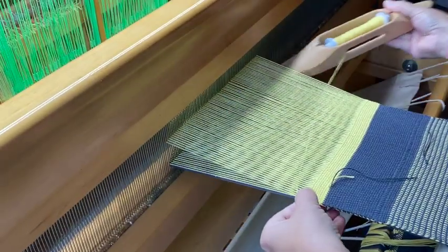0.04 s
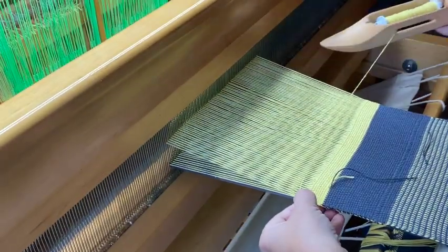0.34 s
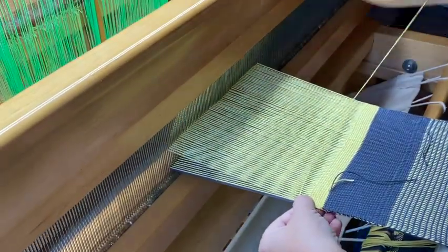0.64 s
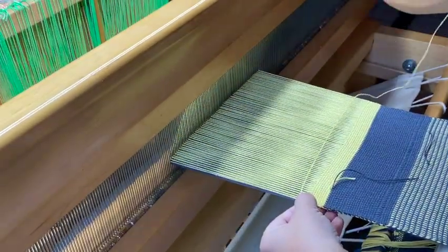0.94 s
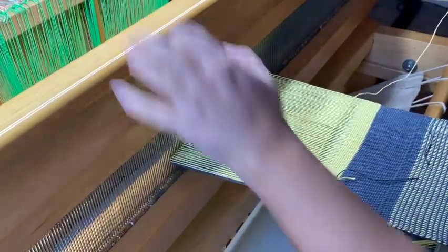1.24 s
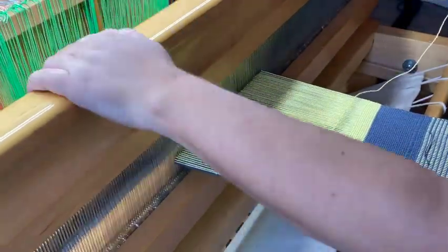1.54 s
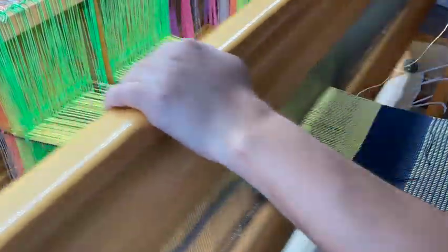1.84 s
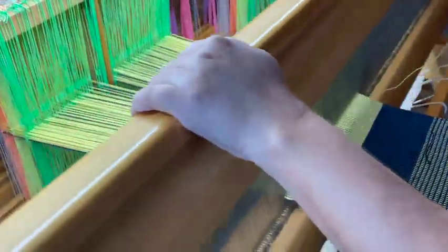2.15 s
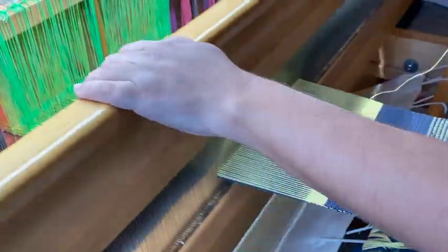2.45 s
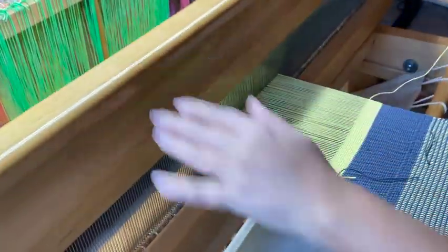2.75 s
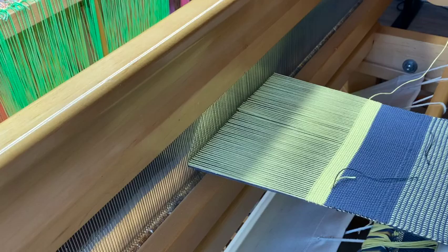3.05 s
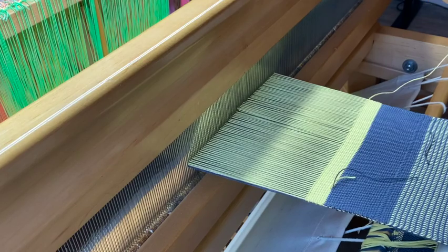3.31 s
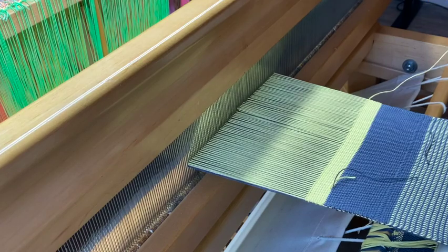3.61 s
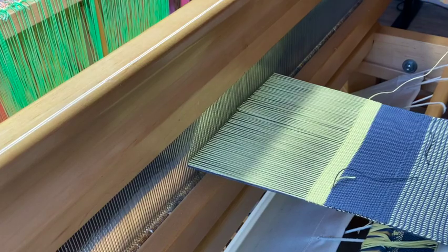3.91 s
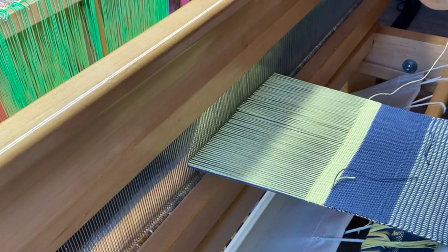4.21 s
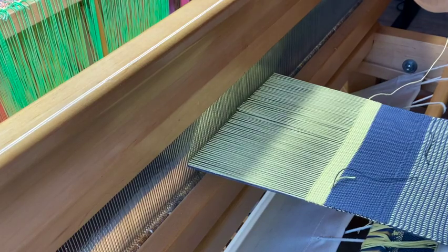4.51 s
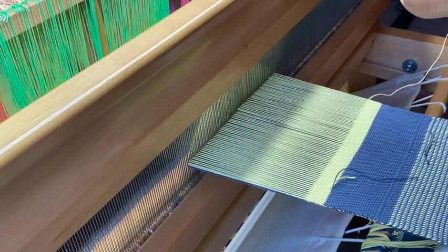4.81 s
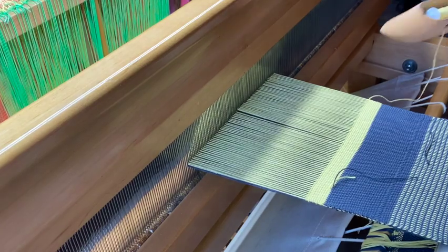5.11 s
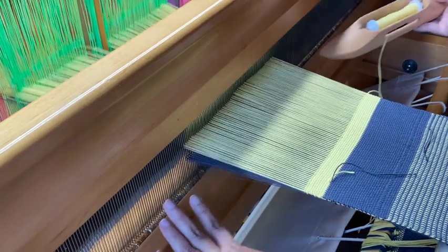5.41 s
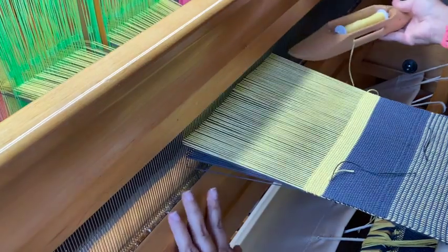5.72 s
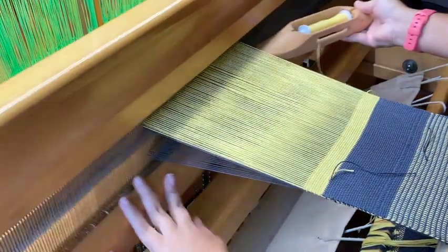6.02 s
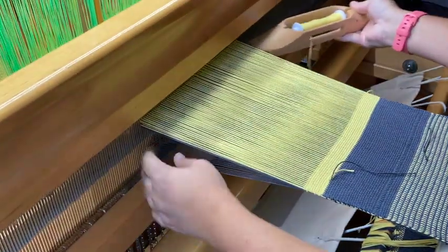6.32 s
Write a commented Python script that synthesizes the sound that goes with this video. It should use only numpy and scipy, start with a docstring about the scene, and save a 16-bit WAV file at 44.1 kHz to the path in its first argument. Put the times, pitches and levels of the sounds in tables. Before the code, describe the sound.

A wooden floor loom is worked in a small room, with clattering metal heddles, wooden knocks and brief high squeaks.

```python
"""One pick on a wooden floor loom in a small room, heard from the weaver's bench.
First the shuttle leaves the shed, its bobbin singing as thread runs off, and the shafts drop with
a clatter of metal heddles. Near 2 s the beater's reed brushes the warp and packs the weft; the beater
knocks on the frame and creaks back on its pivot. From 4.7 s treadles open the next shed and a shaft
scrapes in its guide. At 6 s the shuttle swishes in. Along the way small parts tick and joints squeak."""
import sys
import numpy as np
from scipy import signal
from scipy.fft import rfft, irfft, next_fast_len
from scipy.io import wavfile
from scipy.ndimage import uniform_filter1d

SR = 44100
rng = np.random.default_rng(int(sys.argv[2]) if len(sys.argv) > 2 else 0)


def to_wav(sig):
    """Store sig (one row per channel, or 1-D mono) as 16-bit WAV at the path in sys.argv[1].

    Samples outside -1..1 are clipped; the rate is SR.
    """
    pcm = np.clip(np.atleast_2d(sig), -1, 1) * 32767
    pcm = np.round(pcm).astype(np.int16)
    wavfile.write(sys.argv[1], SR, pcm.T)  # frames by channels


N = 280476
TIME_S = np.arange(N) / SR


# struck wooden parts: name -> (low edge [Hz], note [Hz], note boost [dB], hollow dip [dB], L-R [dB])
WOODEN_PARTS = {"shaft": (307, 820.5, 12.1, 1, 1), "beater": (421.5, 1013.5, 5.5, -3.5, 0.5),
                "post": (480, 560, 8.7, 0.62, 1.5), "treadle": (276, 380, 7.1, 8.3, 0.89),
                "lever": (502, 1860, 16, 2.3, 3.1), "rod": (680, 2300, 8.3, 26, 3.1),
                "handle": (340, 1340, 16, 22, 1.4), "crossbar": (450, 1350, 5.9, 3.5, 2.1),
                "stop": (379, 880, 14, 1.3, 0.86), "upright": (580, 460, 17, 9.5, 1.1),
                "link": (410, 830, 7, 27, 1.2), "pedal": (230, 80, 4.6, 27, 0.5)}
# blows: (time [s], level [dB], part, high edge [Hz], rise [s])
KNOCKS = [ (.165, -44, "shaft", 7000, 0.00085), (.579, -28, "rod", 5800, 0.0012),
          (0.652, -18, "shaft", 2900, 0.0014), (.722, -24.5, "lever", 2400, 0.0032),
          (.79, -17.5, "lever", 4450, 0.00082), (.818, -12, "shaft", 1550, 0.0029),
          (.866, -21.5, "shaft", 5000, 0.011), (.881, -13, "post", 2170, 0.0011),
          (.898, -13, "beater", 2600, 0.0022), (.924, -9, "crossbar", 2320, 0.00099),
          (.968, -14, "shaft", 2370, 0.00082), (1.072, -26.5, "link", 2000, 0.0016),
          (1.365, -24, "handle", 1300, 0.0033), (1.467, -19, "post", 1020, 0.0015),
          (1.477, -11.5, "beater", 1470, 0.0027), (1.508, -17, "post", 1400, 0.0025),
          (1.853, -35.5, "post", 1140, 0.00058), (2.007, -20, "rod", 5700, 0.0073),
          (2.056, -11, "beater", 1900, 0.0018), (2.112, -19, "beater", 1810, 0.0023),
          (2.161, -20, "lever", 2090, 0.00036), (2.245, -21.5, "post", 1700, 0.00061),
          (2.603, -28.5, "post", 1280, 0.0033), (2.782, -26.5, "lever", 3100, 0.0018),
          (3.135, -15, "treadle", 1700, 0.0048), (3.29, -31, "lever", 2020, 0.0022),
          (3.364, -11, "lever", 2240, 0.0045), (3.367, -18, "beater", 1450, 0.0011),
          (3.411, -23.5, "shaft", 1930, 0.0014), (4.656, -23.5, "link", 1735, 0.0011),
          (4.742, -20.5, "pedal", 1870, 0.0052), (4.871, -25.5, "rod", 3480, 0.0012),
          (4.965, -32.5, "link", 2600, .002), (4.979, -7.5, "crossbar", 2920, 0.0029),
          (4.997, -18.5, "lever", 2380, 0.00045), (5.026, -10, "crossbar", 2130, 0.0024),
          (5.052, -15, "shaft", 2250, 0.0024), (5.072, -14.5, "crossbar", 2200, 0.00066),
          (5.105, -18, "post", 1780, 0.0013), (5.163, -7, "stop", 2350, 0.0049),
          (5.2, -14.5, "stop", 2030, 0.0017), (5.273, -19, "post", 1440, 0.0016),
          (5.46, -20.5, "link", 2320, 0.0009), (5.473, -18, "upright", 2140, 0.00048),
          (5.503, -26, "link", 2100, .001), (5.602, -28, "post", 1700, .0008),
          (5.655, -20.5, "crossbar", 1940, 0.003), (5.749, -27.5, "post", 980, 0.001),
          (5.772, -31.5, "post", 1010, 0.0006), (5.803, -29, "upright", 1300, 0.0014),
          (6.025, -30, "upright", 910, 0.016)]

def knocks():
    """Wood hits wood: the harder the contact, the higher the frame modes it reaches."""
    out = np.zeros((2, N))
    for time_s, db, part, high_hz, rise_s in KNOCKS:
        low_hz, note_hz, note_db, hollow_db, side_db = WOODEN_PARTS[part]
        def gain(hz):
            contact = 1 / np.sqrt(1 + (hz / high_hz) ** 10)
            treble = amp(-43) * min(high_hz / 2400, 1.5) ** 2 / (1 + (hz / 6000) ** 4)
            radiation = 1 / np.sqrt((1 + (low_hz / (hz + 1)) ** 5.1) * (1 + hz / 900))
            note = amp(note_db / (1 + ((hz - note_hz) / 35) ** 2))
            hollow = amp(-hollow_db * np.exp(-((hz - 1164) / 220) ** 2))  # hollow parts lack mid modes
            return frame(hz) * (contact + treble) * radiation * note * hollow * modes(hz, spread_db=3)
        blow = burst(ring_s=0.0053, room_db=-4.5)
        blow *= 1 - np.exp(-np.arange(blow.shape[1]) / (rise_s * SR + 1))
        blow[0, 0] += amp(18) * np.exp(-rise_s / 0.0037)  # direct crack of a sudden contact
        add(out, time_s, amp(db + 1) * pan(side_db) * colour(blow, gain))
    return out


# shaft travel: (peak time [s], rise [s], hold [s], fall [s], rattle [dB], jingle [dB])
SHAFT_MOVES = [(.68, 0.143, 0.14, .2, -33.5, -37), (.9, 0.083, 0.029, 0.1, -20, -21.5),
               (1.02, 0.12, 0.03, 0.15, -30.5, -69), (4.73, 0.011, 0.023, 0.13, -40.5, -42.5),
               (5.04, 0.061, 0.019, 0.17, -27.5, -32.5), (5.2, 0.13, 0.26, 0.19, -26.5, -39.5),
               (5.35, 0.35, 0.076, 0.18, -50.5, -27)]
# spectra of wooden shafts and metal heddles: (frequency [Hz], level [dB])
RATTLE_EQ = [(130, -22), (240, -8.5), (330, -16.5), (500, -1.5), (850, -1), (1100, -7), (1450, -4),
             (2200, -4), (3300, -14.5), (5000, -16.5)]
JINGLE_EQ = [(1500, -19.5), (3000, 7.5), (4600, 4), (6300, -4.5), (7700, -6.5), (9600, -5), (11800, -10),
             (13000, -25.5), (15500, -34.5)]

def shafts(rattling, jingling):
    """Moving shafts rattle in their guides and shake the heddles."""
    rattle = contacts(lambda hz: spectrum(RATTLE_EQ, hz) * frame(hz),
                      per_s=260, spread_db=4, ring_s=0.014, wash=0.84, modes_db=4, parts=3)
    jingle = contacts(lambda hz: spectrum(JINGLE_EQ, hz),
                      per_s=240, spread_db=0.5, ring_s=0.014, wash=0.15, modes_db=4, parts=4)
    return amp(4.5) * rattle * rattling * pan(2.2) + amp(2) * jingle * jingling * pan(1)


# shuttle and beater travel:
# (peak time [s], rise [s], hold [s], fall [s], wood [dB], thread [dB], reed [dB])
RUB_MOVES = [(.01, .1, 0.11, 0.15, -58.5, -72.5, -85), (.19, 0.064, 0.61, .2, -53.5, -58, -93),
             (1.44, 0.15, 0.14, 0.12, -47, -65.5, -76), (1.66, 0.11, 0.4, 0.23, -53.5, -64, -65.5),
             (1.98, 0.093, 0.17, 0.039, -45, -51, -46.5), (2.06, 0.064, 0.025, 0.19, -44, -28.5, -49),
             (2.2, 0.17, 0.069, 0.48, -41, -41.5, -69), (2.76, 0.63, 0.12, 0.31, -46.5, -57.5, -84),
             (3.07, 0.047, 0.033, 0.076, -40, -46.5, -61), (3.39, 0.18, 0.0057, 0.14, -55.5, -52, -59),
             (3.62, 0.22, 0.085, 0.39, -59.5, -87.5, -105), (4.02, 0.094, 0.13, 0.18, -55.5, -66, -100),
             (5.82, 0.052, 0.26, 0.11, -40.5, -69, -60.5), (5.96, 0.18, 0.12, 0.095, -37.5, -51.5, -57),
             (6.25, 1, 0.12, .2, -48.5, -63, -71.5)]
# friction spectra: (frequency [Hz], level [dB])
WOOD_EQ = [(120, -23), (300, -2.5), (550, 7), (1100, -0.5), (1700, -1), (2400, -11), (4000, -26.5)]
THREAD_EQ = [(1500, -0.5), (2800, 4), (4200, 1.5), (5500, -10.5), (7500, -14.5), (9000, -31)]
REED_EQ = [(5000, 0.5), (7500, -4), (8600, -3.5), (9800, -1.5), (12000, -2.5), (13200, -12), (15300, -18.5)]

def rubbing(sliding, catching, brushing):
    """Wood slides on wood, threads catch on each other, the reed hisses along the warp."""
    wood_rest_db, thread_rest_db = -70, -89
    wood = contacts(lambda hz: spectrum(WOOD_EQ, hz) * frame(hz),
                    per_s=39, spread_db=6, ring_s=0.025, wash=0.62, modes_db=3.5)
    thread = contacts(lambda hz: spectrum(THREAD_EQ, hz),
                      per_s=100, spread_db=2, ring_s=0.0034, wash=0.97, modes_db=5)
    reed = contacts(lambda hz: spectrum(REED_EQ, hz),
                    per_s=680, spread_db=4.5, ring_s=0.0022, wash=1.3, modes_db=0)
    return (amp(2) * wood * np.hypot(sliding, amp(wood_rest_db)) * pan(0.91)
            + amp(3) * thread * np.hypot(catching, amp(thread_rest_db)) * pan(1.7)
            + amp(2.5) * reed * brushing)


# slips of the returning beater: (time [s], level [dB], pitch [Hz])
PIVOT_SLIPS = [(2.143, -26.5, 4220), (2.153, -26, 4460), (2.212, -26.5, 3980), (2.298, -38, 4340),
               (2.313, -35, 4280), (2.329, -27.5, 4470), (2.369, -35, 3970), (2.398, -42, 4540),
               (2.422, -40, 4420), (2.455, -34.5, 4430), (2.499, -39.5, 4480), (2.531, -36, 4240),
               (2.58, -35.5, 4450), (2.621, -41, 4490), (2.665, -51, 4150), (2.717, -36, 4520),
               (2.762, -35, 4460), (2.847, -35.5, 4680), (2.896, -50, 4800)]

def pivot_creak(ring_s=0.0019, click_db=7, click_band_hz=(3360, 5200)):
    """The beater's pivot sticks and slips: each slip is a dry click and a short ping."""
    out = np.zeros((1, N))
    t = np.arange(1024) / SR
    envelope = (t / ring_s * np.exp(1 - t / ring_s)) ** 2
    band = signal.butter(2, click_band_hz, "bandpass", fs=SR, output="sos")
    for time_s, db, pitch_hz in PIVOT_SLIPS:
        ping = np.sin(2 * np.pi * pitch_hz * t) * envelope
        click = signal.sosfilt(band, rng.standard_normal(len(t)) * envelope)
        add(out, time_s, amp(db) * (ping + amp(click_db) * click)[None])
    return in_room(out[0], room_db=-4) * pan(2)


# joint chirps: (time [s], level [dB], pitch [Hz], length [s], glide [x pitch], roughness [x pitch])
SQUEAKS = [(.285, -52.5, 519, 0.064, -0.033, 0.019), (0.33, -49.5, 3270, .022, 0.015, 0.032),
           (0.489, -51.5, 524, 0.077, 0.076, 0.025), (0.91, -22.5, 4575, 0.016, 0.092, 0.01),
           (0.96, -26, 4670, 0.0082, -0.0036, .012), (0.977, -31, 4662, 0.018, -0.025, 0.023),
           (3.01, -36.5, 4520, 0.016, -0.075, 0.019), (3.012, -48, 5100, 0.032, -0.034, .015),
           (3.025, -34, 4360, 0.026, -0.008, 0.024), (3.36, -27.5, 4600, 0.02, 0.03, 0.021),
           (4.021, -31.5, 4617, 0.012, -0.031, 0.0036), (4.728, -33.5, 2837, 0.054, 0.031, 0.057),
           (5.023, -26, 4660, 0.014, -0.015, 0.0079), (5.614, -42, 2604, 0.043, -0.177, 0.083),
           (5.655, -42.5, 1746, 0.0386, -0.355, .1)]
# chirp partials: (frequency [x pitch], level [dB])
SQUEAK_PARTIALS = [(1, 0), (2, -21)]

def squeaks():
    """Dry joints sing briefly by stick-slip; the room holds the note."""
    out = np.zeros((1, N))
    for time_s, db, pitch_hz, length_s, glide, roughness in SQUEAKS:
        progress = np.linspace(0, 1, int(length_s * SR))
        bend = 1 + glide * (progress - 0.5) + roughness * tremble(len(progress))
        phase = 2 * np.pi * np.cumsum(pitch_hz * bend) / SR
        tone = sum(amp(partial_db) * np.sin(k * phase) for k, partial_db in SQUEAK_PARTIALS)
        add(out, time_s, amp(db) * unit(tone * np.sin(np.pi * progress))[None])
    return in_room(out[0], room_db=0.5) * pan(1.7)


# clicks and thin high squeak overtones: (time [s], level [dB], pitch [Hz], width [oct])
TICKS = [(.209, -50, 4650, 0.84), (0.262, -56, 6960, 0.88), (.371, -43, 5660, 0.4), (.588, -32.5, 7900, 1),
         (0.869, -17.5, 7700, 0.46), (1.477, -40, 2700, 0.21), (2.213, -42, 5460, 0.61),
         (2.355, -46, 7200, 0.065), (2.54, -52.5, 10840, 0.11), (2.725, -54.5, 10500, 0.085),
         (2.782, -27.5, 2760, 0.39), (2.791, -50.5, 9700, 0.088), (3.03, -48, 10200, 0.42),
         (3.059, -30, 2680, 0.5), (3.075, -35.5, 2720, 0.19), (3.257, -48, 4600, 0.5),
         (3.362, -56, 5700, .05), (3.363, -40, 9030, .05), (3.364, -44, 13400, .08),
         (3.366, -59, 11700, .08), (3.98, -59, 7700, 0.28), (4.022, -49.5, 4360, 0.25),
         (4.068, -61, 12400, 0.18), (4.872, -54.5, 11030, 0.16), (4.961, -39.5, 2670, 0.28),
         (5.055, -26, 7450, 1), (5.166, -29, 6400, 0.92), (5.257, -24.5, 5040, 0.17),
         (5.258, -37, 11100, 0.16), (5.525, -40, 9700, 0.37), (5.57, -37.5, 9600, 0.23)]

def ticks():
    """Clicks of hard parts and thin squeak overtones, each one fast-dying resonance, broad or narrow."""
    out = np.zeros((2, N))
    for time_s, db, pitch_hz, width_oct in TICKS:
        def gain(hz):
            detuning = np.log2((hz + 1) / pitch_hz) / (2 * width_oct)
            return modes(hz, spread_db=4) / (1 + detuning ** 2) ** 3
        ring = colour(burst(ring_s=0.0093, room_db=-8), gain)
        add(out, time_s, amp(db + 3) * ring * pan(2.7))
    return out


# shaft sliding in its guide: (time [s], resonance [Hz], level [dB])
SCRAPE_PATH = [(5.25, 5170, -46), (5.27, 5580, -22), (5.359, 5930, -40), (5.461, 6380, -30),
               (5.55, 6470, -28.5), (5.629, 6410, -42.5), (5.7, 6600, -91)]

def shaft_scrape(width_hz=470):
    """Friction noise in a metal resonance that climbs as the shaft slides."""
    time_s, hz, db = np.transpose(SCRAPE_PATH)
    pole = np.exp(-np.pi * width_hz / SR)
    friction = rng.standard_normal(N) + 1j * rng.standard_normal(N)
    band = signal.lfilter([1], np.poly([pole, pole]), friction)
    phase = 2 * np.pi * np.cumsum(np.interp(TIME_S, time_s, hz)) / SR
    ring = (band * np.exp(1j * phase)).real
    return amp(-11) * in_room(unit(ring) * level_curve(time_s, db), room_db=8) * pan(1.5)


# bobbin squeal: (time [s], base pitch [Hz], level [dB])
BOBBIN_PATH = [(0.369, 1070, -72), (.375, 1110, -44.5), (.45, 1106, -51.5), (0.531, 1112, -45.5),
               (.62, 1112, -49), (0.659, 1100, -78)]
# squeal partials: (frequency [x base pitch], level [dB])
BOBBIN_PARTIALS = [(3, 2.5), (4.15, 1), (5.15, -1), (6, 1), (6.9, -8), (7.7, -17.5), (9.4, -21.5)]

def bobbin(roughness=0.026):
    """The spinning bobbin squeals on its spindle; each partial trembles by itself."""
    time_s, hz, db = np.transpose(BOBBIN_PATH)
    base_hz = np.interp(TIME_S, time_s, hz)
    tone = np.zeros(N)
    for multiple, partial_db in BOBBIN_PARTIALS:
        partial_hz = multiple * base_hz * (1 + roughness * tremble(N))
        tone += amp(partial_db) * np.sin(2 * np.pi * np.cumsum(partial_hz) / SR)
    return amp(-2) * in_room(unit(tone) * level_curve(time_s, db), room_db=2) * pan(1.5)


# shuttle entry: (peak time [s], rise [s], hold [s], fall [s])
SWISH_MOVE = (5.95, 0.16, 0.12, 0.07)
# warp-on-shuttle spectrum: (frequency [Hz], level [dB])
SWISH_EQ = [(2400, -9), (3000, 0.5), (4100, -2.5), (4800, -13), (6200, -25), (7700, -7.5), (9500, -13),
            (12300, -11.5), (13200, -12)]

def shuttle_swish():
    """The shuttle's nose parts taut warp threads, which brush over it with an airy hiss."""
    threads = contacts(lambda hz: spectrum(SWISH_EQ, hz),
                       per_s=300, spread_db=0, ring_s=0.0027, wash=2.7, modes_db=4)
    return amp(-39.5) * threads * swell(*SWISH_MOVE) * pan(3.2)


# reed travel: (peak time [s], rise [s], hold [s], fall [s], level [dB])
REED_MOVES = [(1.64, 0.083, .21, 0.11, -61), (1.95, 0.052, 0.13, .08, -64), (2.32, .1, 0.14, 0.13, -66)]
# fibre-on-wire spectrum: (frequency [Hz], level [dB])
SIZZLE_EQ = [(9500, -13), (11000, -14), (11800, 8), (12500, 3), (13200, -6), (15000, 1)]

def reed_sizzle():
    """Warp fibres flick through the reed's thin wires as the beater travels."""
    grains = contacts(lambda hz: spectrum(SIZZLE_EQ, hz),
                      per_s=700, spread_db=0.5, ring_s=0.001, wash=0.5, modes_db=-1)
    return grains * layer_gains(REED_MOVES)[0]


# treadle and beater landings: (time [s], level [dB])
THUMPS = [(.645, -39.5), (1.04, -39), (1.561, -44), (1.882, -44), (2.08, -38.5), (3.39, -49), (4.78, -49),
          (5.19, -37.5), (5.84, -37.5)]
# frame bass spectra: (frequency [Hz], level [dB])
SHUDDER_EQ = [(20, -35), (45, -26), (62, -9.5), (80, -17.5), (125, -3), (180, -10), (300, -3.5)]
BOOM_EQ = [(55, -18.5), (85, -11.5), (120, 1.5), (150, -1.5), (190, -10.5), (280, -13)]

def frame_rumble(rattling, sliding):
    """The frame shudders with rattling shafts and rubbing wood, and booms when a weight lands."""
    shudder = colour(rng.standard_normal((2, N)), lambda hz: spectrum(SHUDDER_EQ, hz) * frame(hz))
    at_rest, from_shafts, from_wood = amp(-68.5), amp(-26.5) * rattling ** 0.59, amp(-29) * sliding ** 0.59
    drive = np.sqrt(at_rest ** 2 + from_shafts ** 2 + from_wood ** 2)
    boom = colour(rng.standard_normal((2, N)), lambda hz: spectrum(BOOM_EQ, hz) * frame(hz))
    landings = sum(amp(db) * swell(time_s, rise_s=0.066, hold_s=0, fall_s=0.082) for time_s, db in THUMPS)
    return (amp(-1) * shudder * drive + boom * landings) * pan(1.2)


# frame and shaft resonances: (centre [Hz], width [Hz], gain [dB])
FRAME_MODES = [(122, 5.2, 5.5), (249.7, 17, 8), (412, 42, 3.5), (490.2, 29, 4), (723, 6, 3), (799, 18, 2.5),
               (894, 28, 4), (1010, 14, 2.5), (1157, 18, 3), (1125, 18, 2.5), (1354, 14, 3), (1474, 32, 4),
               (1574, 11, 3.5), (1976, 99, 3.5), (2390, 140, -3)]

def frame(hz):
    """Gain of the wooden frame's resonances."""
    return amp(sum(db / (1 + (2 * (hz - centre_hz) / width_hz) ** 2)
                   for centre_hz, width_hz, db in FRAME_MODES))


def modes(hz, spread_db):
    """A part's own small modes: random peaks and dips, evenly spaced in pitch."""
    grid_hz = np.geomspace(150, 16000, 170)
    return amp(spread_db * np.interp(hz, grid_hz, rng.standard_normal(len(grid_hz))))


def contacts(gain, per_s, spread_db, ring_s, wash, modes_db, parts=1):
    """Loose parts, each with its own modes, touch at random over the wash of their echoes."""
    out = np.zeros((2, N))
    for _ in range(parts):
        strength = amp(spread_db * np.minimum(rng.exponential(1, N), 3.5))
        hits = strength * (rng.random(N) < per_s / parts / SR)
        power = signal.lfilter([1], [1, -np.exp(-2 / (ring_s * SR))], hits ** 2 + 1e-12)
        bursts = rng.standard_normal((2, N)) * np.sqrt(power / power.mean() + wash)
        out += colour(bursts, lambda hz: gain(hz) * modes(hz, modes_db))
    return unit(out)


def tremble(samples):
    """Quick unsteadiness of stick-slip friction, rms 1."""
    return unit(uniform_filter1d(rng.standard_normal(samples), size=40))


def swell(peak_s, rise_s, hold_s, fall_s):
    """Gain of one movement; rise and fall each span 20 dB, steeper away from the peak."""
    before = np.maximum(peak_s - TIME_S, 0) / (rise_s + 1e-4)
    after = np.maximum(TIME_S - peak_s - hold_s, 0) / (fall_s + 1e-4)
    return amp(-20 * np.minimum(before + after, 10) ** 1.296)


def layer_gains(moves):
    """One gain curve per level column; movements add in power."""
    return np.sqrt(sum((amp(move[4:])[:, None] * swell(*move[:4])) ** 2 for move in moves))


def level_curve(time_s, db):
    """Smoothed gain through level points, fading quickly outside them."""
    return uniform_filter1d(amp(np.interp(TIME_S, time_s, db, left=-150, right=-150)), size=600)


# room decay: (frequency [Hz], T60 [s])
ROOM_T60 = [(100, 0.17), (260, 0.27), (700, 0.34), (1840, 0.29), (4600, 0.34), (8000, 0.09), (9300, 0.27),
            (11000, 0.6), (13200, 0.31)]

def burst(ring_s, room_db):
    """Noise that dies quickly of itself, then as the room's tail, band by band."""
    hz, t, bands = signal.stft(rng.standard_normal((2, 16384)), SR, nperseg=256)
    power = np.exp(-2 * t / ring_s) + amp(room_db - 60 * t / lookup(ROOM_T60, hz)[:, None]) ** 2
    fade = 1 - (t / t[-1]) ** 10
    return signal.istft(bands * np.sqrt(power) * fade, SR, nperseg=256)[1]


def in_room(direct, room_db):
    """Mono direct sound plus the room's diffuse stereo tail."""
    hz, t, bands = signal.stft(rng.standard_normal((2, SR // 2)), SR, nperseg=256)
    decay = amp(-60 * t / lookup(ROOM_T60, hz)[:, None])
    build_up = np.minimum(t / 0.029, 1)
    tail = signal.istft(bands * decay * build_up, SR, nperseg=256)[1]
    wet = signal.fftconvolve(direct[None], tail / np.linalg.norm(tail[0]), axes=1)[:, :N]
    return direct + amp(room_db) * wet


# left-right likeness of close microphones: (frequency [Hz], coherence [0-1])
COHERENCE = [(60, 0.62), (180, 0.89), (380, 0.33), (700, 0.044), (1400, 0.018), (3000, 0.069),
             (7000, 0.072), (12000, 0.59)]

def colour(pair, gain):
    """Rings two unrelated signals through a causal, unit-power gain(hz) and blends them to stereo."""
    size = next_fast_len(pair.shape[1], real=True)
    hz = np.fft.rfftfreq(size, 1 / SR)
    cepstrum = irfft(np.log(unit(gain(hz)) + 1e-5), size)
    cepstrum[1:size // 2] *= 2  # fold to minimum phase
    cepstrum[size // 2 + 1:] = 0
    mid, side = rfft(pair, size) * np.exp(rfft(cepstrum))
    coherence = lookup(COHERENCE, hz)
    mid *= np.sqrt((1 + coherence) / 2)
    side *= np.sqrt((1 - coherence) / 2)
    return irfft(np.array([mid + side, mid - side]), size)[:, :pair.shape[1]]


def amp(db):
    """Decibels to gain."""
    return 10 ** (np.asarray(db) / 20)


def unit(x):
    """Scales to rms 1."""
    return x / np.sqrt(np.mean(x ** 2) + 1e-20)


def lookup(table, hz):
    """Interpolates a table on a log-frequency axis."""
    table_hz, values = np.transpose(table)
    return np.interp(np.log(hz + 1), np.log(table_hz + 1), values)


def spectrum(eq, hz):
    """Gain of an EQ table, falling steeply beyond its ends."""
    outside = np.maximum(eq[0][0] / (hz + 1), 1) * np.maximum(hz / eq[-1][0], 1)
    return amp(lookup(eq, hz)) / outside ** 4


def pan(db):
    """Channel gains for a left-minus-right level."""
    return amp([[db / 2], [-db / 2]])


def add(mix, time_s, sound):
    """Mixes a sound in at time_s."""
    span = mix[:, round(time_s * SR):][:, :sound.shape[1]]
    span += sound[:, :span.shape[1]]


def scene():
    """All parts of the loom together."""
    rattling, jingling = layer_gains(SHAFT_MOVES)
    sliding, catching, brushing = layer_gains(RUB_MOVES)
    motion = shafts(rattling, jingling) + rubbing(sliding, catching, brushing)
    background = frame_rumble(rattling, sliding) + shuttle_swish() + reed_sizzle()
    joints = pivot_creak() + squeaks()
    return knocks() + motion + joints + ticks() + bobbin() + shaft_scrape() + background


# housing shades one microphone: (frequency [Hz], L-R [dB])
MIC_SHADING = [(125, 2.5), (250, -2), (500, 0), (1000, -0.5), (4000, 3), (8000, 0.5), (12000, -2.5)]

def record(dry):
    """Stereo delay and balance, a tone EQ with a dull top, clipping and a band limit; the sound also thins near
    8.6 kHz."""
    right_delay_s, band_limit_hz = 0.00002, 15800
    # (frequency [Hz], level [dB])
    tone_eq = [(100, -3.5), (7000, 0), (8600, -7), (10500, 0.5), (12200, -2), (13200, -11.5), (15500, -12)]
    hz = np.fft.rfftfreq(N, 1 / SR)
    lag = np.exp(-2j * np.pi * hz * right_delay_s)
    shading = amp(lookup(MIC_SHADING, hz) / 2)
    pair = irfft(rfft(dry) * np.array([shading, lag / shading]), N)
    grid_hz = np.linspace(0, SR / 2, 513)
    tone_taps = signal.firwin2(513, grid_hz, amp(lookup(tone_eq, grid_hz)), fs=SR)
    clipped = np.clip(signal.oaconvolve(pair, tone_taps[None], "same"), -1, 1)
    lowpass = signal.firwin(511, band_limit_hz, window=("kaiser", 9), fs=SR)
    return signal.oaconvolve(clipped, lowpass[None], "same")


dry = scene()
out = record(dry)
to_wav(out)
```